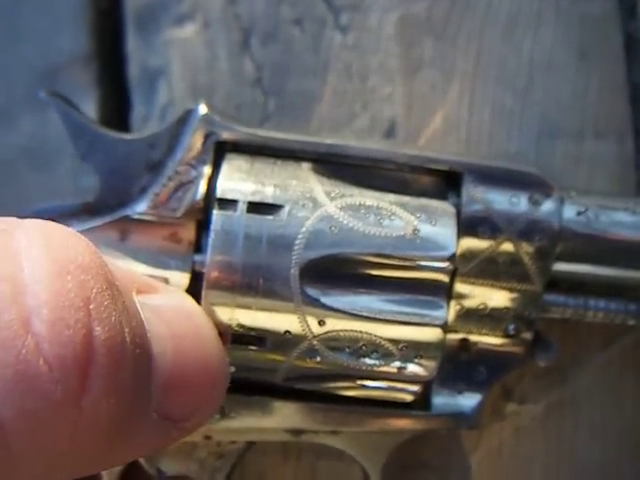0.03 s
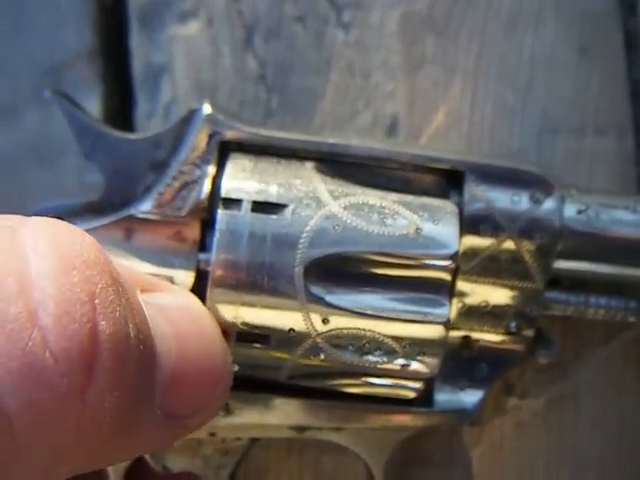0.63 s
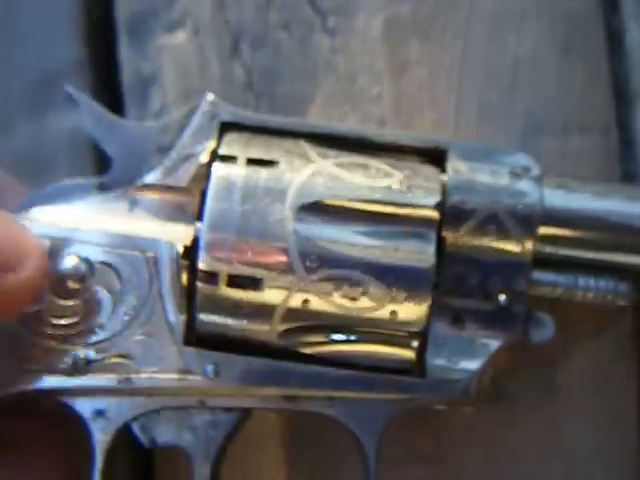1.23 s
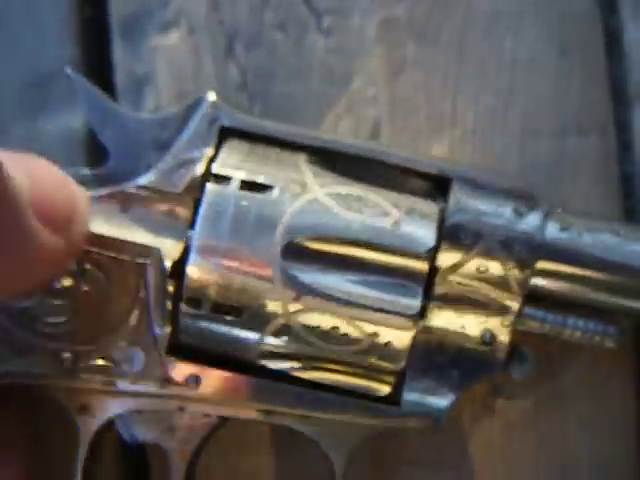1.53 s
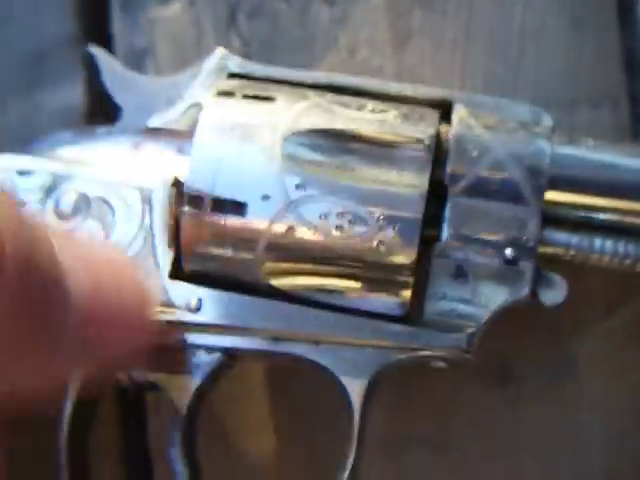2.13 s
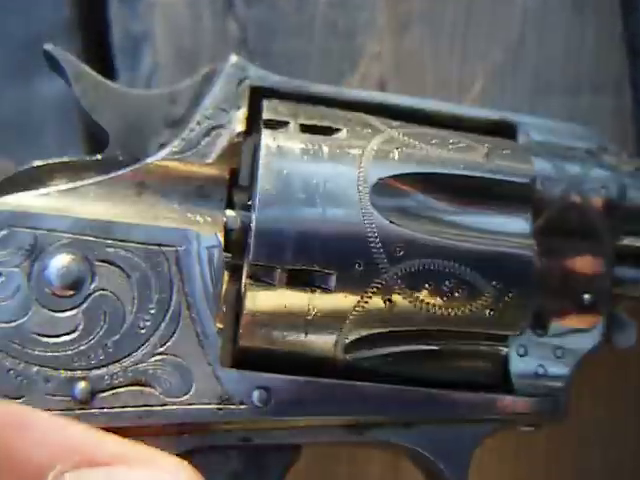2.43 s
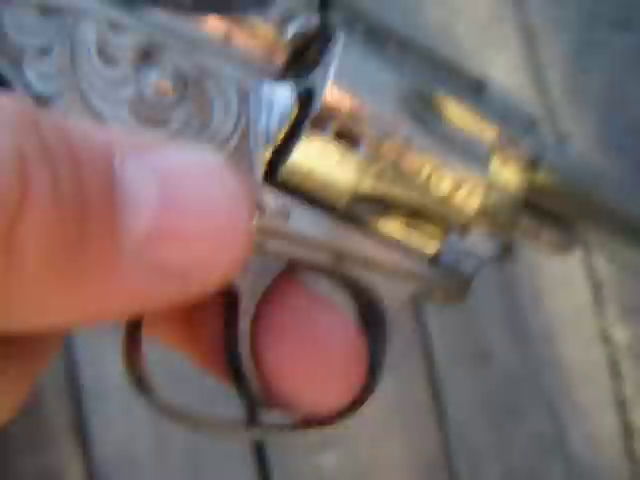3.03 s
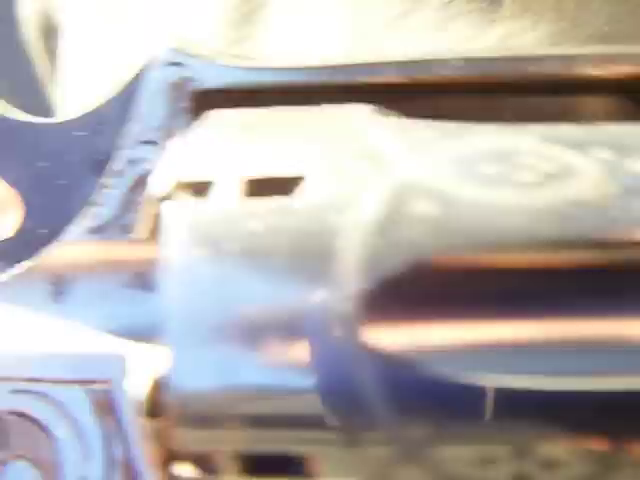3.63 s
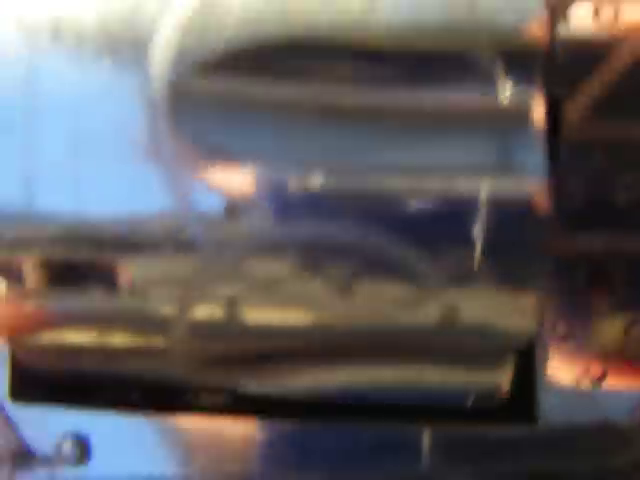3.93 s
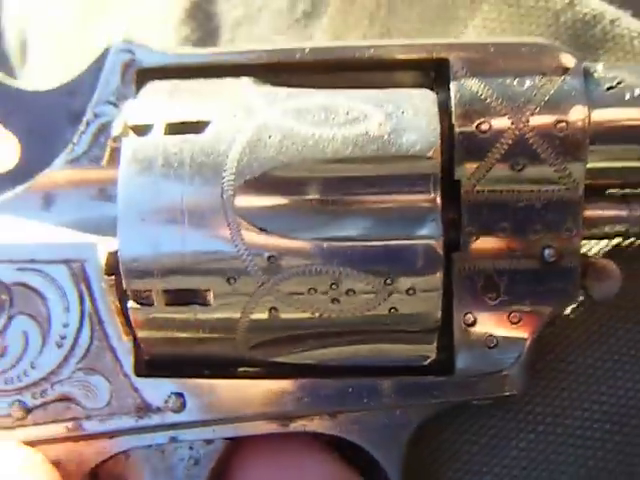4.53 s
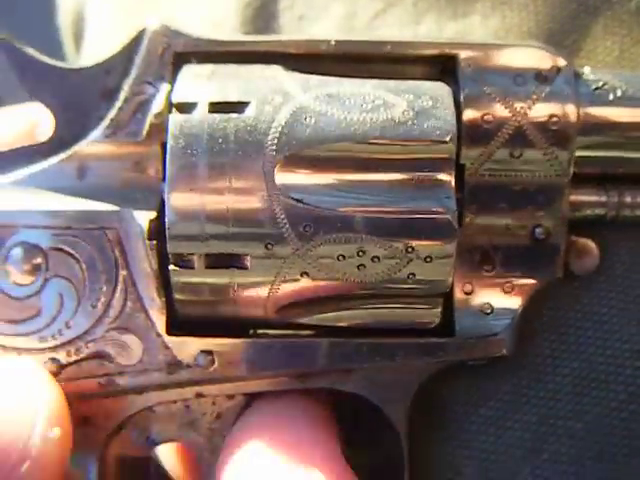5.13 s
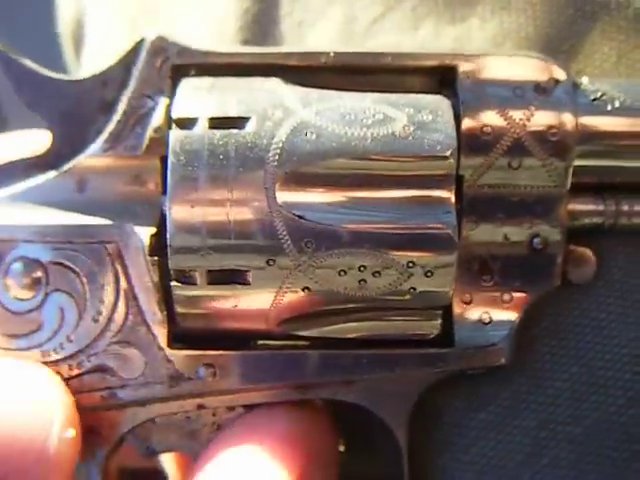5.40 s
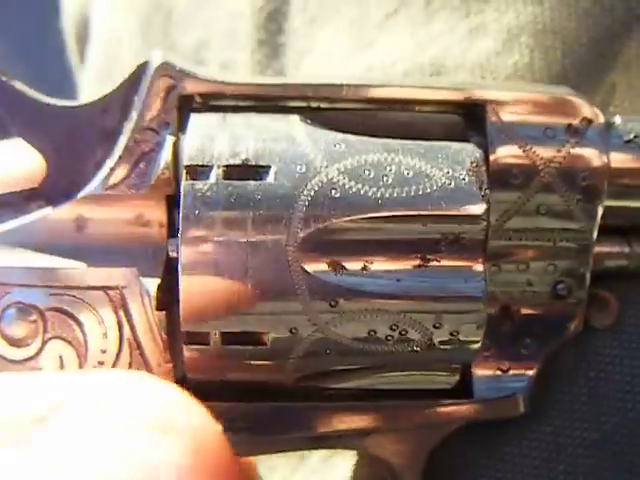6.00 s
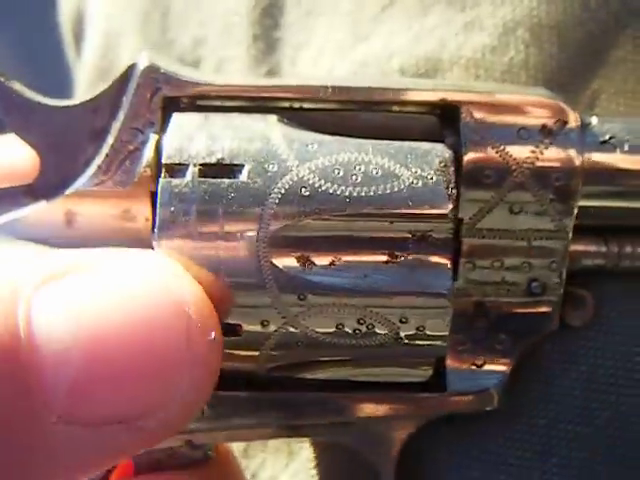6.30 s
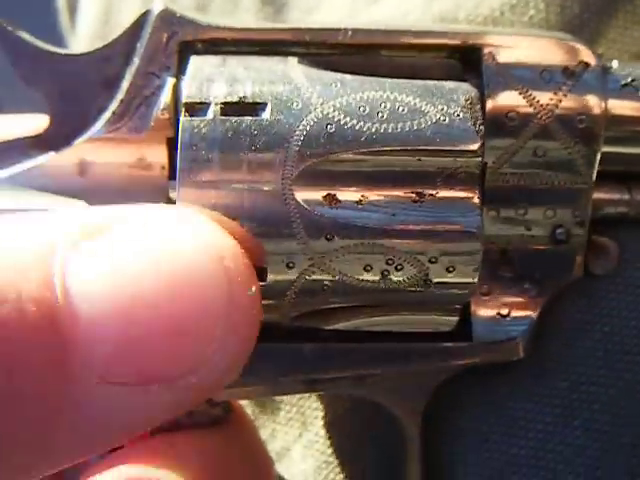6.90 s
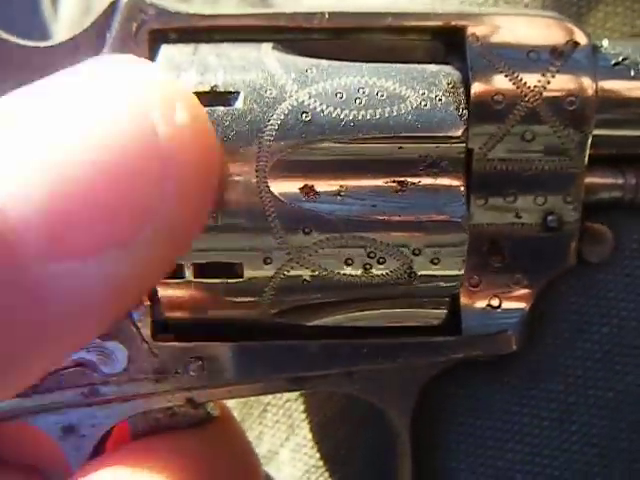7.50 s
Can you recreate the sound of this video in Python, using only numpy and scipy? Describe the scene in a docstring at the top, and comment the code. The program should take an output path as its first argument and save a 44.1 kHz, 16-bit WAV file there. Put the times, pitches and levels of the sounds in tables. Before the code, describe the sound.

A metal revolver handled in steady wind, with small clicks, a hollow knock, rustling cloth and one loud, sharp cylinder snap.

```python
"""Handling a revolver in the wind

A steel revolver is turned over in the hands outdoors, close to a small camera, in a steady rush of wind.
Its loose action ticks, the hand bumps the grip, cloth slides, then the cylinder clicks and snaps home.
The snap drives the camera's limiter down, so the wind ducks and swells back while the steel rings out."""
import sys
import numpy as np
from scipy import signal
from scipy.fft import rfft, irfft
from scipy.io import wavfile
from scipy.ndimage import uniform_filter1d, minimum_filter1d

SR = 44100
rng = np.random.default_rng(int(sys.argv[2]) if len(sys.argv) > 2 else 0)


def persist_wave(psi):
    """Save psi, clipped to +-1, as 16-bit WAV."""
    counts = np.round(np.clip(psi, -1, 1) * 32767).astype(np.int16)
    wavfile.write(sys.argv[1], SR, np.atleast_2d(counts).T)


N = 341775
TIME = np.arange(N) / SR
HIT_TIME = TIME[:SR // 2]  # every hit gets half a second to die away


# The bright ring of the cylinder in its frame: pitch_hz, level_db, t60_s
CYLINDER_MODES = [(1940, -7, .04), (2195, -7, .04), (2400, -4, .12), (2675, -6, .06), (2995, -9, .12),
                  (3320, -5, .18), (3390, -2, .26), (3490, -4, .2), (3760, -7, .12), (3920, -3, .3),
                  (4280, -8, .22), (4560, -5, .08), (4810, -11, .2), (4960, -9, .06)]
# Bolt and pawl striking the cylinder, packed into one snap: start_s, level_db, centre_hz, width_octaves
SNAP_STRIKES = [(6.0794, -17.5, 3600, 0.55), (6.0812, 3.5, 2400, 0.26), (6.081, 4.5, 4200, 0.24),
                (6.0837, 1.5, 1900, 1.6), (6.0859, 14, 3400, 0.22), (6.089, 2, 3800, 0.54)]
def cylinder_snap(held_t60_s=0.015, tail_db=-33, spring_db=-31):
    """Each strike dies fast in the tight frame; a little rings on in the cylinder and buzzes a spring."""
    out = np.zeros(N)
    for start_s, level_db, hz, octaves in SNAP_STRIKES:
        steel = ring(CYLINDER_MODES, hz, octaves, rise_s=0.00012)
        tone = level_attack(steel * (fade(held_t60_s) + undb(tail_db)))
        scrape = undb(-0.5) * crack(hz, hz * octaves, t60_s=0.0083)
        # a broad contact also shoves the frame
        frame = undb(-5) * octaves * np.sin(2 * np.pi * 740 * HIT_TIME) * fade(t60_s=0.014)
        buzz = crack(centre_hz=3480, width_hz=850, t60_s=0.23)
        sizzle = undb(-3) * crack(centre_hz=3650, width_hz=4700, t60_s=0.24)
        spring = undb(spring_db) * (buzz + sizzle)
        add(out, start_s, undb(level_db) * (tone + scrape + frame + spring))
    return high_pass(out, hz=478)


# The hollow ring of a bump: pitch_hz, level_db, t60_s
BODY_MODES = [(120, -10, .06), (246, -3, .12), (380, -4, .1), (437, -6, .08), (482, -4, .08),
              (595, -5, .065), (681, -3, .055), (720, -0.5, .06), (820, -3, .035), (1088, -7, .04),
              (1200, -3, .025), (1380, -6, .02)]
# The hand landing on the grip: start_s, level_db, centre_hz, width_octaves
GRIP_BUMPS = [(.1415, -26.5, 745, 0.24), (0.4278, -24.5, 395, 0.12), (.4275, -25, 790, 0.12),
              (0.6956, -26, 395, 0.16), (.6956, -23.5, 854, 0.16), (1.345, -30, 132, 0.42),
              (1.354, -27, 230, 0.3), (1.758, -27.5, 506, 2.1), (2.259, -25, 156, 1.1),
              (2.268, -29.5, 230, 0.46), (2.436, -2, 687, 1.17), (2.4434, -18, 602, 0.51),
              (2.468, -16, 394, 0.56), (2.796, -28, 396, 0.68), (5.8875, -26, 756, 0.25),
              (6.693, -25, 410, 0.23)]
def grip_bumps(flesh_hz=1500):
    """Each bump rings the body's modes around its centre, narrowly or broadly; the hand dulls the top."""
    out = np.zeros(N)
    for start_s, level_db, hz, octaves in GRIP_BUMPS:
        tone = level_attack(ring(BODY_MODES, hz, octaves, rise_s=0.00042))
        thud = undb(-17) * crack(hz, hz * octaves, t60_s=0.034)
        add(out, start_s, undb(level_db) * high_pass(tone + thud, hz=60 + 0.25 * hz))
    return signal.sosfilt(signal.butter(3, flesh_hz, fs=SR, output="sos"), out)


# The short, tight ring of the action's small parts: pitch_hz, level_db, t60_s
ACTION_MODES = [(2130, -15, 0.01), (2364, 1, 0.0084), (2783, 4.5, 0.0085), (3040, -0.5, 0.0071),
                (3320, 1, 0.0058), (3810, 0.5, 0.0066), (4130, -5.5, 0.016), (4770, -6, 0.012),
                (4930, -10.5, .016), (5440, -17, 0.014)]
# Clicks of the loose action: start_s, level_db, centre_hz, width_octaves
ACTION_TICKS = [(0.14, -21.5, 2980, 0.29), (0.4263, -29.5, 2600, 0.7), (0.6948, -23.5, 3200, 0.83),
                (1.338, -38.5, 2400, 0.8), (1.757, -24.5, 3500, 0.47), (2.2686, -22.5, 4070, 0.45),
                (2.436, -19, 3124, 0.34), (2.8483, -31, 3820, 0.22), (2.999, -25.5, 3870, 0.24),
                (4.1222, -29, 2900, 0.6), (5.4802, -34, 3700, .9), (5.672, -35, 3000, .9),
                (5.856, -33, 3500, .9), (5.887, -16.5, 3800, .1), (5.8871, -22, 5500, 0.051),
                (6.062, -32, 3800, .7), (6.6933, -35, 3740, 0.5), (6.8779, -35, 3190, 0.77),
                (7.5583, -34, 3100, .9)]
def action_ticks():
    """Small steel parts take up their play; the hand damps them within milliseconds."""
    out = np.zeros(N)
    for start_s, level_db, hz, octaves in ACTION_TICKS:
        tone = level_attack(ring(ACTION_MODES, hz, octaves, rise_s=0.0002))
        grit = undb(-10.5) * crack(hz, hz * octaves, t60_s=0.016)
        add(out, start_s, undb(level_db) * (tone + grit))
    return high_pass(out, hz=1830)


# The tone of the cloth's hiss: frequency_hz, level_db
CLOTH_SPECTRUM = [(150, -29.5), (600, 3), (1400, 1), (2000, -4), (3000, 0.5), (4500, -0.5), (5200, -0.5),
                  (6000, -11.5), (9000, -41)]
# Cloth sliding under the hands: start_s, length_s, hiss_db, rasp_relative_db
CLOTH_STROKES = [(1.57, 0.16, -55, -3), (2.899, 0.062, -44, -9), (2.956, 0.54, -38, -3.5),
                 (3.4, 0.6, -45, -8), (3.792, 0.18, -42, -3), (3.937, 0.23, -48, -11),
                 (4.167, 0.21, -42, -14), (4.63, 0.27, -51.5, -3), (4.853, 0.28, -49, -5),
                 (5.144, 0.72, -58.5, 3.5), (5.931, 0.07, -48.5, -9), (6.01, 0.07, -43, -19),
                 (6.1, 1.12, -56.5, 5)]
def cloth(hold_db=-55, press_db=7.5, flicker_db=0.4):
    """Fibres catch and let go in tiny slips: louder with speed, raspier as the hand bears down."""
    hiss_power = undb(hold_db) ** 2  # hands that merely hold the gun still rub faintly
    rasp_power = 0
    for start_s, length_s, hiss_db, rasp_db in CLOTH_STROKES:
        gain = undb(hiss_db) * stroke(start_s, length_s)
        pressure_db = press_db * (progress(start_s, length_s) - 0.5)
        hiss_power += gain ** 2
        rasp_power += (gain * undb(rasp_db + pressure_db)) ** 2
    slips = rng.standard_normal(N) * (rng.random(N) < 0.3)
    hiss = np.sqrt(hiss_power) * colour(slips, CLOTH_SPECTRUM)
    rasp = np.sqrt(rasp_power) * unit(steep_band(rng.permutation(slips), hz=2100, width_hz=1500))
    return (hiss + rasp) * undb(flicker_db * walk(rate_hz=35))


def sleeve(start_s=3.0, length_s=0.32, level_db=-40, fade_db_per_s=23,
           from_hz=1280, to_hz=1455, glide_s=0.073):
    """The sleeve sings in the fastest stroke: one narrow, unsteady resonance that glides up and fades."""
    age_s = np.maximum(TIME - start_s, 0)
    pitch_hz = to_hz + (from_hz - to_hz) * np.exp(-age_s / glide_s)
    tone = np.sin(2 * np.pi * np.cumsum(pitch_hz) / SR)
    sing = unit(walk(rate_hz=210) * tone)
    return sing * stroke(start_s, length_s) * undb(level_db - fade_db_per_s * age_s)


def thumb_rub(start_s=6.22, length_s=0.83, level_db=-59):
    """After the snap, skin sliding on steel keeps the cylinder faintly singing with fine friction."""
    steel = ring(CYLINDER_MODES, centre_hz=3500, octaves=0.35, rise_s=0.00013)
    sing = unit(signal.fftconvolve(rng.standard_normal(N), steel)[:N])
    return undb(level_db) * stroke(start_s, length_s) * sing


# The tone of the wind bed, fullest in the mids: frequency_hz, level_db
WIND_SPECTRUM = [(25, -26.5), (60, -17), (120, -9.5), (240, -6.5), (400, -3.5), (560, -1.5), (1000, 1),
                 (1250, -4), (1600, -10), (2300, -18.5), (3500, -24.5), (5000, -23.5), (6000, -34)]
def wind(level_db=-39.5, swell_db=1.13, gust_db=1.05, flutter_db=2,
         hollow_from_db=-56.5, hollow_to_db=-47.5):
    """A broad rush whose bands flutter on their own; a low hollow band grows as the gun is turned."""
    turned = progress(start_s=2.8, length_s=0.96)
    bed_db = level_db + swell_db * (turned - 0.5) + gust_db * walk(rate_hz=1.5)
    hollow_db = hollow_from_db + (hollow_to_db - hollow_from_db) * turned
    bands = sum(undb(flutter_db * walk(rate_hz=20)) * resonate(rng.standard_normal(N), hz, width_hz=hz)
                for hz in (450, 1000))
    rush = undb(-6.5) * colour(bands, WIND_SPECTRUM)
    air = colour(rng.standard_normal(N), WIND_SPECTRUM) * undb(0.5 * walk(rate_hz=5.4))
    hollow = unit(steep_band(rng.standard_normal(N), hz=352, width_hz=160))
    return undb(bed_db) * (air + rush) + undb(hollow_db) * hollow


def ring(modes, centre_hz, octaves, rise_s):
    """Damped modes swing up while a contact lasts; those near its centre are fed the most."""
    pitch_hz, level_db, t60_s = np.transpose(modes)
    contact_db = -10 * np.log10(1 + (np.log2(pitch_hz / centre_hz) / octaves) ** 4)
    gains = undb(level_db + contact_db)
    pitch_hz = pitch_hz * (1 + 0.0039 * rng.standard_normal(len(modes)))  # the grip detunes them a little
    tone = sum(gain * fade(t60) * np.sin(2 * np.pi * hz * HIT_TIME)
               for hz, gain, t60 in zip(pitch_hz, gains, t60_s))
    return (1 - np.exp(-HIT_TIME / rise_s)) * tone


def crack(centre_hz, width_hz, t60_s):
    """The brief rough noise of two surfaces meeting."""
    burst = rng.standard_normal(len(HIT_TIME)) * fade(t60_s)
    return level_attack(steep_band(burst, centre_hz, width_hz))


def level_attack(hit):
    """Scale a hit so that its first three milliseconds swing to about 1."""
    return hit / (2 * np.sqrt(np.mean(hit[:128] ** 2)))


def fade(t60_s):
    """Exponential decay, 60 dB down after t60_s."""
    return np.exp(-np.log(1000) * HIT_TIME / t60_s)


def stroke(start_s, length_s, attack_share=0.17, release_share=0.42):
    """Speed of a hand movement, 0 to 1: it speeds up, holds, slows down."""
    part = progress(start_s, length_s)
    return np.clip(np.minimum(part / attack_share, (1 - part) / release_share), 0, 1)


def progress(start_s, length_s):
    """How far a movement has got, 0 to 1."""
    return np.clip((TIME - start_s) / length_s, 0, 1)


def walk(rate_hz):
    """A wobble: random steps smoothed twice; rms 1."""
    hold = int(SR / rate_hz)
    steps = np.repeat(rng.standard_normal(N // hold + 1), hold)
    return unit(uniform_filter1d(uniform_filter1d(steps, hold), hold)[:N])


def colour(x, spectrum):
    """EQ a sound along a curve of frequency_hz, level_db points; rms 1."""
    hz, db = np.transpose(spectrum)
    bins_hz = np.fft.rfftfreq(len(x), 1 / SR) + 1
    gain = undb(np.interp(np.log(bins_hz), np.log(hz), db))
    return unit(irfft(rfft(x) * gain, len(x)))


def resonate(x, hz, width_hz):
    """One broad resonance."""
    return signal.lfilter(*signal.iirpeak(hz, hz / min(width_hz, SR / 4), fs=SR), x)


def steep_band(x, hz, width_hz):
    """The same resonance twice, for steeper flanks."""
    return resonate(resonate(x, hz, width_hz), hz, width_hz)


def high_pass(x, hz):
    """Thin out the lows, which a small part barely radiates."""
    return signal.sosfilt(signal.butter(4, hz, "high", fs=SR, output="sos"), x)


def add(out, start_s, x):
    """Mix a sound in at start_s."""
    i = int(start_s * SR)
    out[i:i + len(x)] += x[:N - i]


def undb(db):
    """Decibels to gain."""
    return 10 ** (np.asarray(db) / 20)


def unit(x):
    """Scale to rms 1."""
    return x / np.sqrt(np.mean(x ** 2))


def scene():
    """Everything reaches one microphone from close by, with no walls to echo."""
    hits = action_ticks() + cylinder_snap() + grip_bumps()
    return (hits + wind() + cloth() + sleeve() + thumb_rub())[None]


def record(dry, treble_hz=5300, band_hz=6050, top_hz=16000,
           ceiling_db=-1.1, release_db_per_s=190, clip_level=0.78):
    """A dull, narrow-band microphone; its limiter clamps fast and lets go steadily, and peaks clip."""
    dull = signal.sosfilt(signal.butter(10, treble_hz, fs=SR, output="sos"), dry)
    narrow = signal.sosfilt(signal.ellip(8, 0.3, 60, band_hz, fs=SR, output="sos"), dull)
    over_db = np.maximum(20 * np.log10(np.abs(narrow) + 1e-9) - ceiling_db, 0)
    release_db = release_db_per_s * TIME
    duck_db = np.maximum.accumulate(over_db + release_db, axis=1) - release_db
    held_db = -minimum_filter1d(-duck_db, size=48)  # the limiter looks a little ahead
    eased_db = uniform_filter1d(held_db, size=48)  # and clamps over about a millisecond
    clipped = np.clip(narrow * undb(-eased_db), -clip_level, clip_level)
    return signal.sosfilt(signal.ellip(8, 0.2, 70, top_hz, fs=SR, output="sos"), clipped)


dry = scene()
out = record(dry)
persist_wave(out)
```